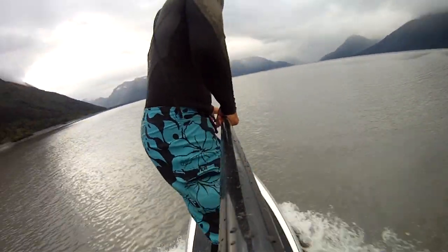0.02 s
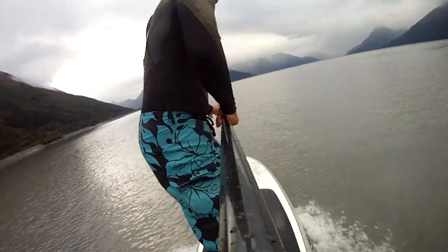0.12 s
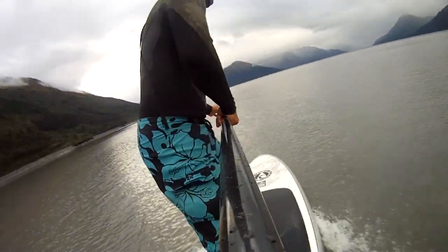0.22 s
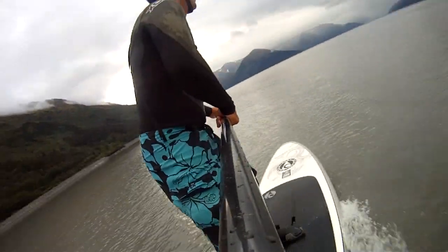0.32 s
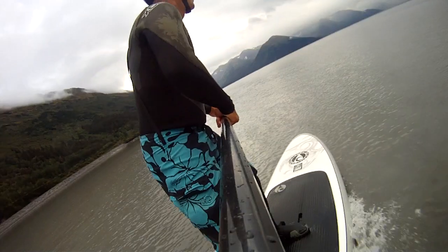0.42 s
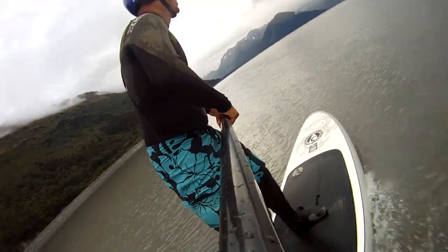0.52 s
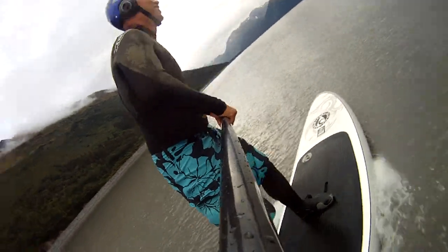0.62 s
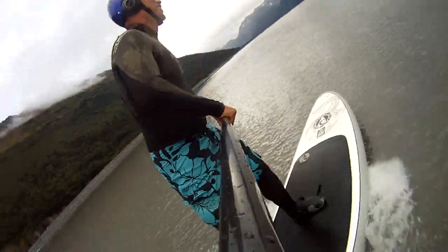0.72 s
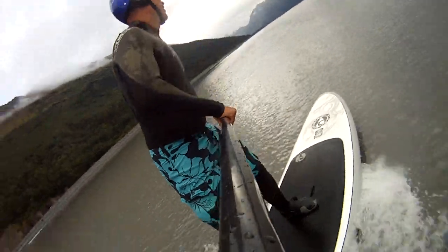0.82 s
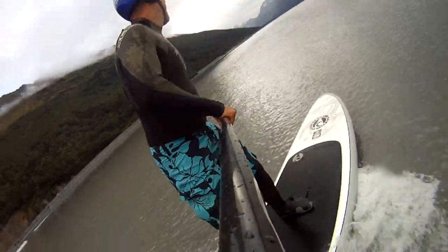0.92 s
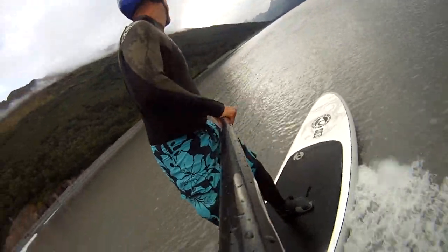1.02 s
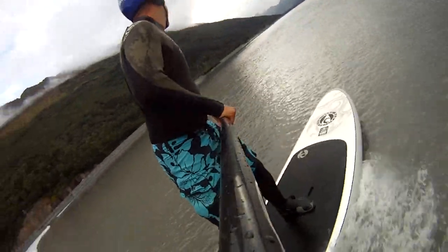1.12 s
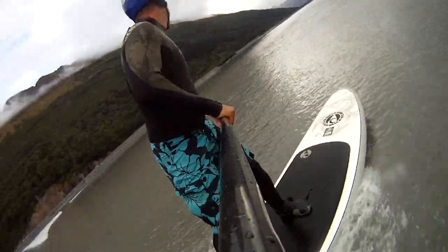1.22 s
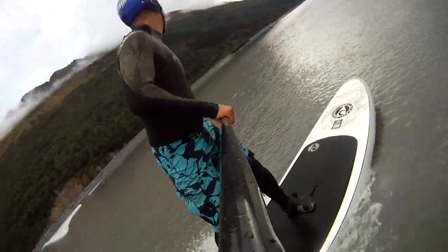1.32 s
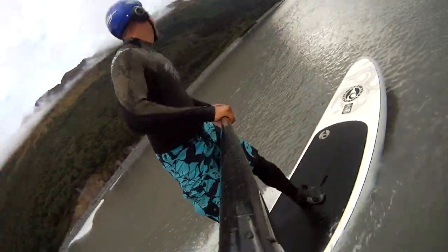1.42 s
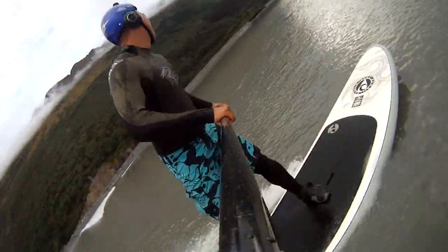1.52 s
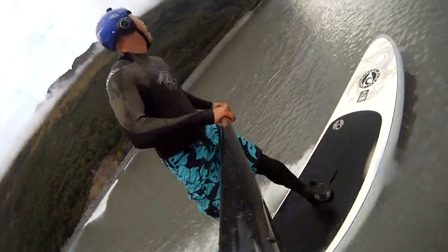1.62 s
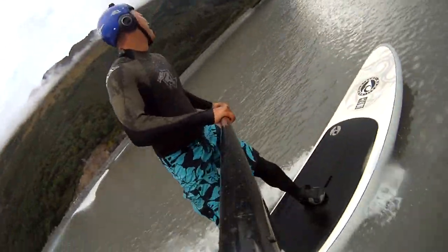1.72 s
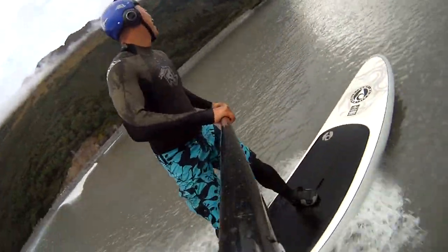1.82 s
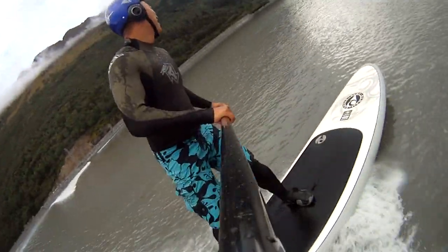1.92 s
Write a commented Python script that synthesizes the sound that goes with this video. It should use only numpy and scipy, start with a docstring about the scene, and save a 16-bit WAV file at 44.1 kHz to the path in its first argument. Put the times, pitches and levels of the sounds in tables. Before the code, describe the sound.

Water rushes and fizzes steadily along a paddleboard over a low rumble, heard close from the paddle. At about 0.3 seconds the paddle knocks with a deep thud, followed by splashes and churning. It knocks again near 0.5 seconds, with a brief judder and a faint tap. From about 1.3 seconds a softer splash and churn arrive, with a low hum from the shaft that slowly fades.

```python
"""A paddleboard rides a wave, heard in mono from a cased camera on the paddle shaft.
From the start, water rushes and fizzes along the rail over a low rumble. At 0.26 s the paddle knocks,
ringing the modes of the case, and the loaded shaft hums low; splashes and a deep churn follow.
At 0.47 s it knocks again, then the grip judders in stick-slip and ends on a faint tap. From 1.28 s
a softer splash and churn come as water loads the shaft again, and its hum slowly dies away."""
import sys
import numpy as np
from scipy import signal
from scipy.fft import rfft, irfft, next_fast_len
from scipy.io import wavfile
from scipy.ndimage import uniform_filter1d, map_coordinates

SR = 44100
rng = np.random.default_rng(int(sys.argv[2]) if len(sys.argv) > 2 else 0)


def file_out(sig):
    """Save sig as 16-bit WAV at sys.argv[1]."""
    # one column per channel
    cols = np.atleast_2d(sig).T
    # limit, then scale
    lim = np.clip(cols, -1, 1)
    pcm = np.round(lim * 32767).astype(np.int16)
    wavfile.write(sys.argv[1], SR, pcm)


N = 88200
T = np.arange(N) / SR

# Flow along the rail: t/s, rush level/dB, spray level/dB (both before trim and flutter)
FLOW_LEVELS = [(0, -40.5, -47), (.3, -43, -51), (.48, -38.5, -49), (.87, -42, -48.5), (1.21, -42, -49),
               (1.37, -42.5, -50.5), (1.53, -45, -54), (1.74, -45.5, -53), (2, -43, -50)]
# Spectra of rush and spray as they come through the case: f/Hz, relative level/dB
RUSH_SPECTRUM = [(100, -11), (300, -10), (440, -11.5), (540, -9), (640, -12), (950, -12), (1130, -6),
                 (1280, -1), (1500, -6.5), (1900, -6), (2300, -5.5), (2720, -4.5), (3150, -13), (3550, -8),
                 (4000, -16.5), (4600, -67), (6000, -54)]
SPRAY_SPECTRUM = [(2500, -29), (3800, 1), (4400, 0), (5250, 4), (5550, -1.5), (5850, -17), (6200, -12.5),
                  (6700, 3), (7700, -4.5), (8450, 3.5), (8900, -3), (9350, 5), (10400, -3.5), (10750, 2),
                  (11150, -17.5), (11800, -21), (12600, -18), (13250, -3.5), (13800, -2), (14750, 0.5),
                  (15400, -10)]
# Bends of the shaft: t/s, rise/s, settled f/Hz, level/dB, T60/s
SHAFT_BENDS = [(0.2668, 0.0067, 49.7, -6.5, .11), (0.3403, 0.019, 69, -13.5, 0.12),
               (0.4735, 0.0082, 47, -14.5, 0.1), (1.292, 0.015, 56.3, -28.5, 0.83),
               (1.373, 0.038, 57.9, -22, 0.43), (1.534, 0.06, 53.4, -25, 0.81)]
# Knocks of the paddle: t/s, gain/dB, cut-off f/Hz (higher for a harder contact)
PADDLE_KNOCKS = [(.2645, -26.5, 16000), (0.4718, -28, 1470), (.549, -40.5, 1500)]
# Modes of the paddle and camera case: f/Hz, relative level/dB, T60/s
CASE_MODES = [(143, -9.5, 0.086), (360, -2.5, 0.064), (540, -2.5, 0.051), (705, 0, 0.042), (1115, 5, 0.033),
              (1264, 5, 0.047), (1726, 0.5, 0.025), (2120, -5.5, 0.034), (2736, 6, 0.016),
              (3160, 0.5, 0.01), (3554, 0.5, 0.018), (8500, -4.5, 0.016), (9150, -2, 0.011),
              (10500, -17, 0.017), (13100, -17, 0.023), (14750, -3, .012)]
# Spectra of a knock's crack, a thin rasp or fizz, and a slip of the grip: f/Hz, relative level/dB
CRACK_SPECTRUM = [(100, 4), (3500, -0.5), (4200, -19.5), (6000, -33), (9000, -11), (15000, -18)]
RASP_SPECTRUM = [(7000, -38), (10200, 5.5), (12000, -5), (13500, 4.5), (15400, -11)]
SLIP_SPECTRUM = [(80, -2), (180, 8.5), (260, -4), (400, -7.5), (650, -8), (950, -17.5), (1300, -11),
                 (1800, -8.5), (3000, -48), (6000, -50)]
# Splashes against the rail: t/s, rise/s, T60/s, gush level/dB, fizz level/dB
RAIL_SPLASHES = [(.322, 0.029, 0.2, -35, -48.5), (.415, 0.015, 0.24, -40, -51.5),
                 (1.278, 0.037, 0.92, -42.5, -56)]
# Thuds of water on the blade: t/s, f/Hz, level/dB
BLADE_THUDS = [(.229, 54, -21), (.433, 70, -21.5), (1.294, 119, -26.5), (1.32, 138, -37)]
# Churns under the turning board: t/s, hold/s, level/dB
BOARD_CHURNS = [(0.333, 0.03, -33.5), (1.278, 0.094, -47.5), (1.362, 0.373, -50.5)]
# Spectra of a splash's gush, the churn and the rumble: f/Hz, relative level/dB
GUSH_SPECTRUM = [(60, -6), (130, -4), (280, -5), (480, -8), (720, 2), (900, -2.5), (1280, 1.5), (1750, 4),
                 (2600, -6), (4000, -16), (6000, -45)]
CHURN_SPECTRUM = [(50, -11), (105, 1.5), (180, -6), (280, -10.5), (450, -21), (900, -41.5)]
RUMBLE_SPECTRUM = [(15, -28), (32, -3.5), (50, 0.5), (72, -8), (100, -16), (150, -34.5), (300, -44),
                   (800, -74)]
# Course of the ride's rumble: t/s, level/dB
RUMBLE_LEVELS = [(0, -37.5), (.2, -36.5), (.58, -41.5), (.78, -45.5), (.87, -36.5), (1.02, -45.5),
                 (1.2, -37.5), (1.75, -40.5), (2, -41)]

BAND_LIMIT_HZ = 15450


def rush(flutter_db):
    """Bubble resonance: damped tones ring in flow noise, which also drives the case's main resonance."""
    times, level_db, _ = np.transpose(FLOW_LEVELS)
    case_hz, half_width_hz, trim_db = 1247, 60, -0.2
    bubbles = grains(per_s=1200, centre_hz=1734, log_spread=.7, cycles=15.4, size_db=3.5)
    flow = coloured(patchy(depth_db=1.48) + amp(-13.5) * bubbles, RUSH_SPECTRUM)
    hum = unit(filtered(noise(), lambda hz: 1 / (1 + ((hz - case_hz) / half_width_hz) ** 2)))
    return (flow + amp(-11) * hum) * amp(trim_db + np.interp(T, times, level_db) + flutter_db)


def spray(flutter_db):
    """Superposition: many tiny drop impacts merge with a hiss into a flickering fizz."""
    times, _, level_db = np.transpose(FLOW_LEVELS)
    trim_db = -0.26
    drops = grains(per_s=900, centre_hz=7350, log_spread=1.0, cycles=6.5, size_db=2.5)
    fizz = coloured(patchy(depth_db=0.5) + amp(-8.5) * drops, SPRAY_SPECTRUM)
    return fizz * amp(trim_db + np.interp(T, times, level_db) + flutter_db + 1.05 * wobble(40))


def shaft():
    """Bending vibration: the loaded shaft starts sharp and settles to its low natural frequency."""
    sag_hz, sag_s = 14.1, 0.029
    out = np.zeros(N)
    for start, rise, hz, db, t60 in SHAFT_BENDS:
        age = np.maximum(T - start, 0)
        turns = hz * age + sag_hz * sag_s * (1 - np.exp(-age / sag_s))
        out += amp(db) * swell(start, rise, t60) * np.sin(2 * np.pi * turns)
    return out


def knocks():
    """Impact excitation: each knock rings the case, with a short crack and a trailing rasp."""
    out = np.zeros(N)
    for start, db, cut_hz in PADDLE_KNOCKS:
        crack = filtered(coloured(noise(), CRACK_SPECTRUM), lambda hz: 1 / np.hypot(1, hz / cut_hz))
        crack *= swell(start, rise=0.00071, t60=0.029)
        rasp = coloured(noise(), RASP_SPECTRUM) * swell(start, rise=0.0009, t60=0.09)
        out += amp(db) * (case_ring(start, cut_hz) + amp(3.5) * crack + amp(-13.5) * rasp)
    return out


def case_ring(start, cut_hz):
    """Modal response: a contact rings every mode of the case, a soft one the high modes only weakly."""
    out = np.zeros(N)
    for k, (hz, db, t60) in enumerate(CASE_MODES):
        gain = amp(db + rng.standard_normal()) / np.hypot(1, (hz / cut_hz) ** 2)
        out += (-1) ** k * gain * ring(start, hz, t60)
    return out


def judder():
    """Stick-slip friction: the grip slips ever faster, each slip a dull pulse, a soft tap and a rasp."""
    start, length_s, slip_hz, rise_hz_per_s = .4865, .051, 129, 2200
    age = np.clip(T - start, 0, length_s)
    turns = slip_hz * age + rise_hz_per_s * age ** 2 / 2
    times = T[:-1][np.diff(np.ceil(turns)) > 0]  # one slip a cycle
    times += .045 * rng.standard_normal(len(times)) / slip_hz
    sizes = amp(3.5 * rng.standard_normal(len(times)))
    pulses = coloured(np.bincount((times * SR).astype(int), sizes, N), SLIP_SPECTRUM)
    taps = sum(case_ring(s, cut_hz=870) for s in times)
    rasp = coloured(noise(), RASP_SPECTRUM) * sum(swell(s, rise=0.0012, t60=0.028) for s in times)
    return amp(-45.5) * pulses + amp(-39) * taps + amp(-49.5) * rasp


def splashes():
    """Impact noise: water hitting the rail gives a broadband gush and fizz that decay together."""
    gush = coloured(patchy(depth_db=-0.5), GUSH_SPECTRUM)
    fizz = coloured(noise(), RASP_SPECTRUM)
    return sum((amp(gush_db) * gush + amp(fizz_db) * fizz) * swell(start, rise, t60)
               for start, rise, t60, gush_db, fizz_db in RAIL_SPLASHES)


def thuds():
    """Heavy damping: water striking the blade gives a low tone that dies in a few cycles."""
    return sum(amp(db) * ring(start, hz, t60=0.083) for start, hz, db in BLADE_THUDS)


def churn():
    """Turbulence: water under the turning board gives swells of deep noise."""
    envelope = sum(amp(db) * swell(start, rise=0.016, t60=0.15, hold=hold)
                   for start, hold, db in BOARD_CHURNS)
    return coloured(noise(), CHURN_SPECTRUM) * envelope


def rumble():
    """Amplitude modulation: the low noise of the ride wanders in level."""
    level_db = np.interp(T, *np.transpose(RUMBLE_LEVELS)) + 0.76 * wobble(7.46)
    return amp(level_db) * coloured(noise(), RUMBLE_SPECTRUM)


def amp(db):
    """Decibel law: 20 dB is a factor of ten in amplitude."""
    return 10 ** (np.asarray(db) / 20)


def unit(x):
    """Normalisation to rms 1."""
    return x / np.sqrt(np.mean(x ** 2) + 1e-20)


def noise():
    """White noise: equal mean power per hertz."""
    return rng.standard_normal(N)


def wobble(per_s):
    """Spline interpolation: a smooth curve through per_s random knots a second."""
    return map_coordinates(rng.standard_normal(int(N * per_s / SR) + 4), [T * per_s])


def filtered(x, response):
    """Linear filtering: the spectrum of x times a frequency response."""
    size = next_fast_len(N + 8192)
    return irfft(rfft(x, size) * response(np.fft.rfftfreq(size, 1 / SR)), size)[:N]


def coloured(x, spectrum):
    """Spectral shaping by (f/Hz, level/dB) points, at rms 1."""
    f, db = np.transpose(spectrum)
    return unit(filtered(x, lambda hz: amp(np.interp(np.log(hz + 1), np.log(f), db))))


def patchy(depth_db):
    """Random modulation: noise whose gain varies in patches of time and frequency, at rms 1."""
    cells = signal.stft(noise(), nperseg=512)[2]
    patches = uniform_filter1d(rng.standard_normal(cells.shape), size=5, axis=0)
    patches = uniform_filter1d(patches, size=9, axis=1)
    return unit(signal.istft(cells * amp(depth_db * unit(patches)), nperseg=512)[1][:N])


def grains(per_s, centre_hz, log_spread, cycles, size_db):
    """Shot noise: random damped sines, each falling 60 dB over the given cycles, at rms 1."""
    when, pitch, size = np.hsplit(rng.random((int(per_s * N / SR), 3)), 3)
    hz = np.minimum(centre_hz * np.exp(log_spread * (2 * pitch - 1)), BAND_LIMIT_HZ)
    gain = amp(-size_db * np.log(np.maximum(size, np.exp(-4))))
    offsets = np.arange(512)
    turns = hz * offsets / SR
    waves = gain * np.sin(2 * np.pi * turns) * amp(-60 * turns / cycles)
    samples = (when * N).astype(int) + offsets
    return unit(np.bincount(samples.ravel(), waves.ravel(), N)[:N])


def swell(start, rise, t60, hold=0):
    """Exponential decay, 60 dB in t60 seconds, after a smooth rise and an optional hold."""
    attack = np.sin(np.pi / 2 * np.clip((T - start) / rise, 0, 1)) ** 2
    return attack * amp(-60 * np.maximum(T - start - rise - hold, 0) / t60)


def ring(start, hz, t60):
    """Damped oscillation: a sine that builds up during a brief contact, then decays."""
    age = np.maximum(T - start, 0)
    return np.sin(2 * np.pi * hz * age) * swell(start, rise=0.00025, t60=t60)


def scene():
    """Superposition: all sources add and reach both channels alike."""
    flutter_db = 0.27 * wobble(23.9)  # shared by rush and spray
    flow = rush(flutter_db) + spray(flutter_db)
    mono = flow + shaft() + knocks() + judder() + splashes() + thuds() + churn() + rumble()
    return np.array([mono, mono])


def record(dry):
    """Low-pass filtering: the camera keeps nothing above its band limit."""
    return np.array([filtered(x, lambda hz: hz < BAND_LIMIT_HZ) for x in dry])


dry = scene()
out = record(dry)
file_out(out)
```